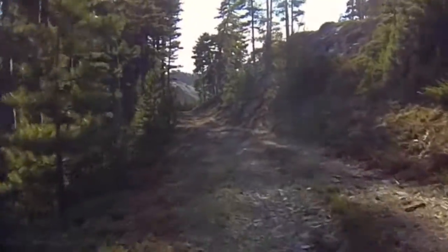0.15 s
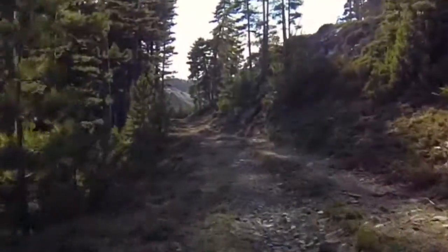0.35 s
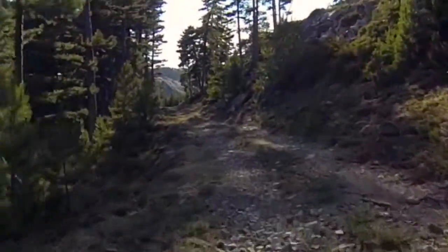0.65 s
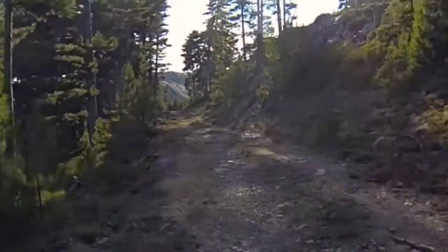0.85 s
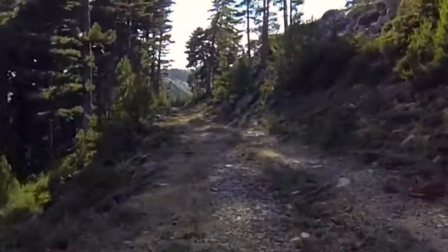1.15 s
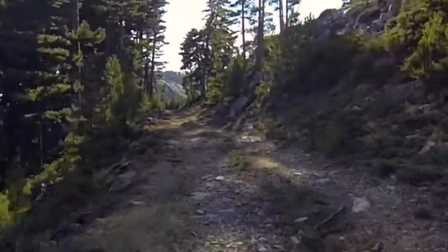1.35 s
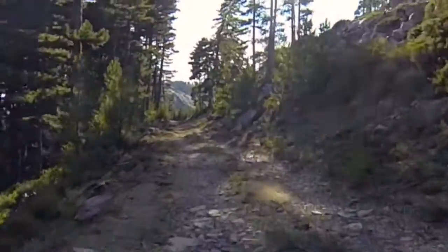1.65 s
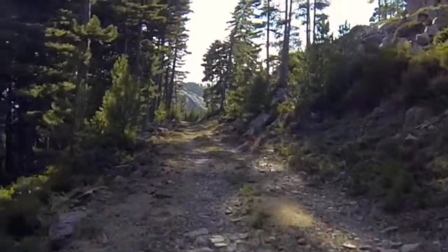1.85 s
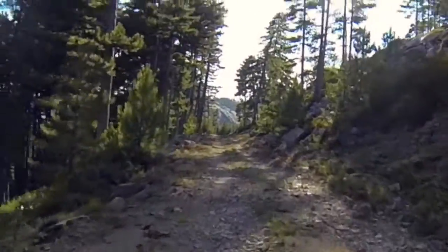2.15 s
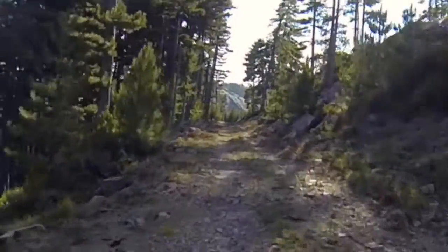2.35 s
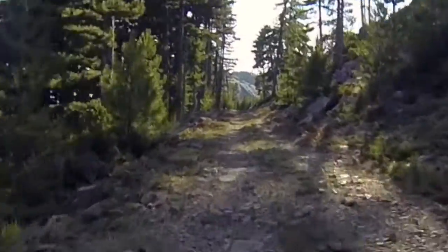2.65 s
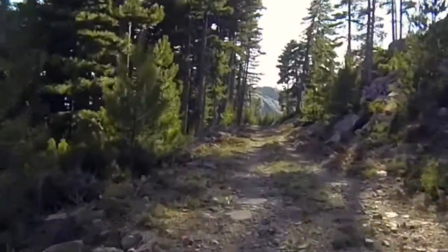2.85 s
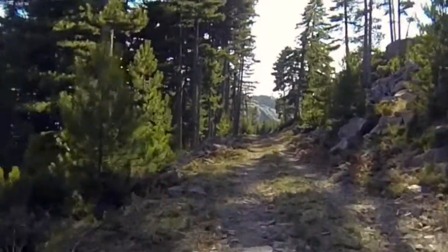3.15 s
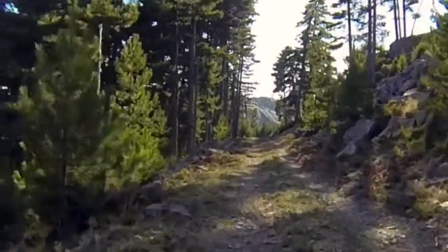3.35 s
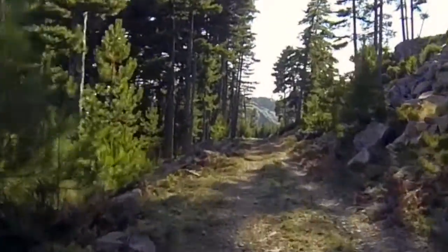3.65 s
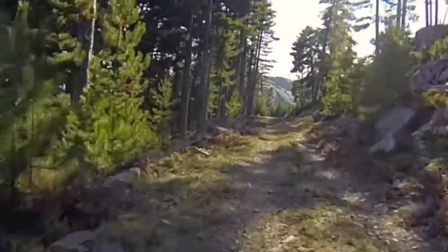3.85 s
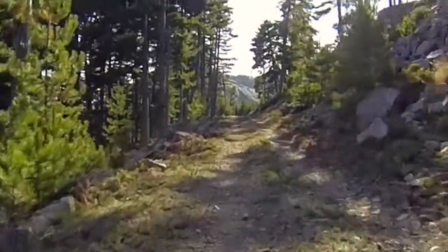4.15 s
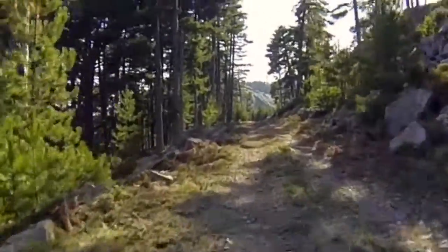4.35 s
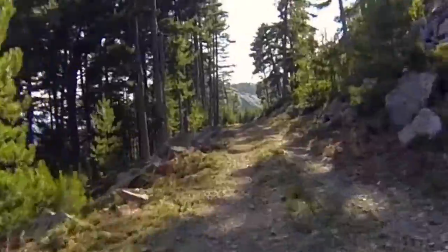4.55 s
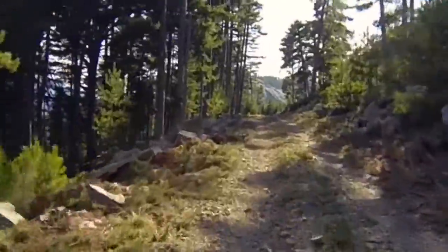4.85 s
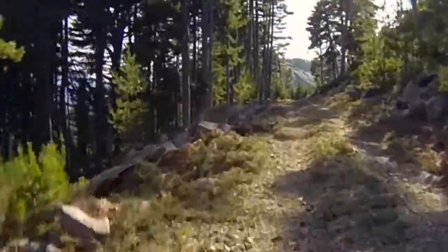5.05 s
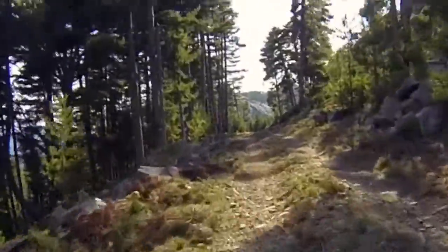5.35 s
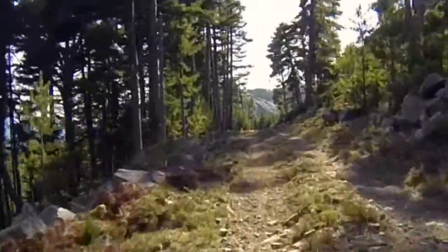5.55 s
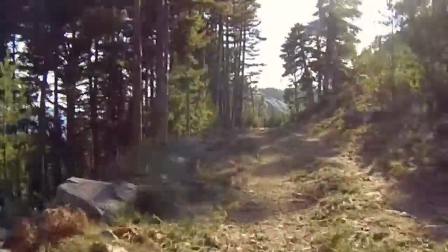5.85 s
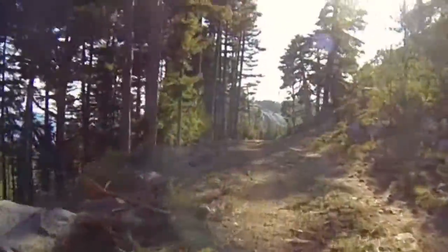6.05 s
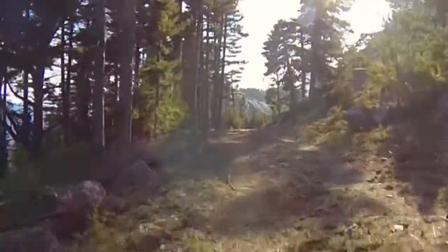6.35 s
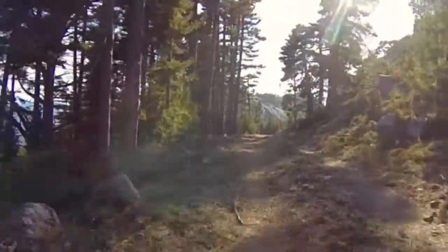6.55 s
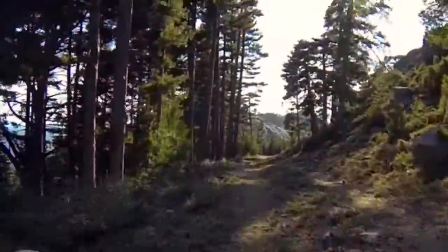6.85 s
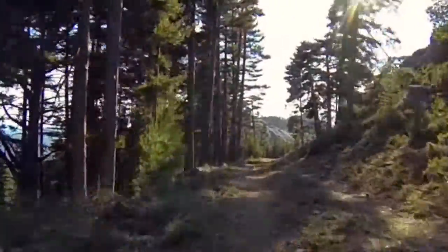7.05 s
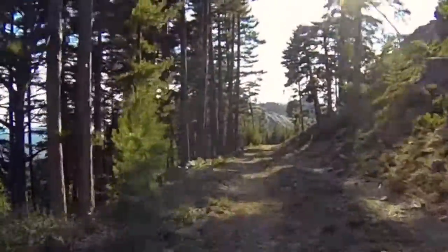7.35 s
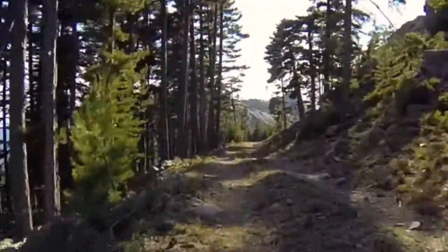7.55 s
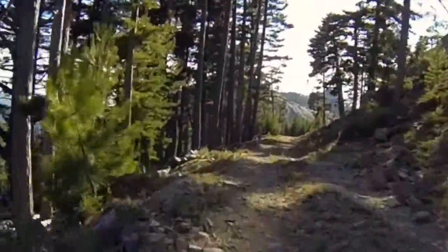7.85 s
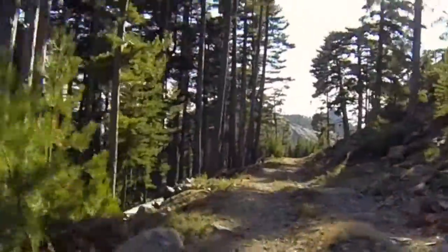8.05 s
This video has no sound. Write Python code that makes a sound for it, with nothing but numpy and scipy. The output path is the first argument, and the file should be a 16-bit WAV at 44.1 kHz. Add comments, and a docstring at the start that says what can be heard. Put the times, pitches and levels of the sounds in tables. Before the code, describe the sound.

A mountain bike rolls fast over a rocky trail for about eight seconds, heard close and muffled through a closed camera housing on the rider. From the start, jolts make a low, uneven boom while the tyres crunch over gravel, slip briefly on grit and knock hollowly on stones. Flung stones or the chain clack irregularly against the frame several times a second, over a faint thin hiss. Wind gusts on the microphone at about 0.5 seconds and again at 4. The hardest, sharpest clacks land at around 5.6 to 5.8 seconds and at 6.8; after the biggest, everything else dips and swells back. The wind rises to its strongest from about 7.3 to 7.8 seconds, and a heavy stone knock comes at 8 seconds as the bike keeps rolling.

```python
"""A mountain bike rolls fast down a rocky trail, heard from a closed camera housing on the rider.
From the start, jolts make the mount boom, tyres crunch over gravel and knock on stones, and flung
stones or the chain clack on the frame, all muffled by the housing. Wind gusts at half a second and
again at four. Near 5.6 and 6.8 s the hardest clacks land; the limiter ducks everything and lets it
swell back. The wind then rises to its strongest, and a heavy stone knocks just before the end."""
import sys
import numpy as np
from scipy import signal
from scipy.fft import rfft, irfft
from scipy.io import wavfile
from scipy.ndimage import uniform_filter1d, minimum_filter1d

SR = 44100
rng = np.random.default_rng(int(sys.argv[2]) if len(sys.argv) > 2 else 0)


def transcribe(u):
    """Save the signal u as a 16-bit wav file named by the first command-line argument.

    u: samples, shape (n,) or (channels, n), limited to [-1, 1]; the rate is SR.
    q: integer samples, one column per channel.
    """
    v = np.clip(np.atleast_2d(u).T, -1, 1)
    q = np.round(v * 32767).astype(np.int16)
    wavfile.write(sys.argv[1], SR, q)


N = 362040
TIME = np.arange(N) / SR

# Tone curves. Each row: frequency in Hz, relative level in dB.
RUMBLE_TONE = [(4, -19), (12, -15), (22, 0.5), (31, -5), (40, -1.5), (55, 0), (64, -5), (76, -15.5),
               (100, -26.5), (128, -26), (175, -33.5), (900, -79.5)]   # the shaken mount
WIND_TONE = [(30, -7.5), (80, -0.5), (128, 1), (175, -7.5), (230, -8.5), (400, -27), (1000, -47),
             (4000, -82)]   # low buffeting
HISS_TONE = [(1000, 16), (6000, 7), (9000, 16), (12000, -7), (15000, -10)]   # thin treble
CRUNCH_TONE = [(60, -5), (200, -5), (320, -3.5), (650, -2.5), (850, -1.5), (1130, -6), (1450, 1.5),
               (1620, -24.5), (2300, -15), (4000, -26.5), (8000, -45), (15000, -86)]   # dull, coarse gravel
GRIT_TONE = [(700, -25.5), (1600, -3), (2050, 3), (2450, -2.5), (3000, -7.5), (4000, -19), (5500, -24),
             (7000, -36), (10000, -42.5), (15000, -49)]   # bright, fine grit
SNAP_TONE = [(1500, -64.5), (3500, 21), (4600, 11), (5600, 5.5), (8500, -0.5), (10000, -13), (13000, -10),
             (15500, -15)]   # the crisp edge of a hit
# Resonances of the housing. Each row: centre in Hz, width in Hz, lift in dB.
HOUSING_MODES = [(220, 24, 5.5), (278, 42, 7.5), (302, 12, -1), (378, 29, 4.5), (492.4, 88, 5.5),
                 (770, 77, 6), (853, 66, 5.5), (982, 123, 8.5), (1250, 60, 5.5), (1520, 106, 5.5),
                 (1833, 260, 7.5), (2453, 81, 5), (3137, 210, 7.5), (4830, 230, 6.5), (6760, 170, 7),
                 (11150, 910, 13)]
# The frame's ring after a clack. Each row: pitch in Hz, relative level in dB, seconds to fall 60 dB.
FRAME_MODES = [(2420, -38, 0.18), (3100, -46, 0.25), (5040, -60, 0.29), (6433, -71, .3), (7004, -66, .3)]

# Fader moves. Each row: time in seconds, level in dB.
RUMBLE_FADER = [(0, -12.5), (.27, -21.5), (.6, -8.5), (.77, -20), (1.05, -13.5), (1.25, -17.5),
                (1.57, -11.5), (1.85, -17.5), (2.2, -12), (2.6, -17), (3.0, -25), (3.45, -13.5), (4.5, -15),
                (5.4, -12), (5.7, -15), (6.3, -11), (6.75, -19.5), (7.2, -9), (7.7, -14), (8.21, -10.5)]   # how hard the trail shakes the mount
WIND_FADER = [(0, -45), (.55, -26), (.8, -35.5), (2.4, -41), (2.8, -43), (3.4, -40), (4.0, -25.5),
              (4.4, -33), (5.4, -28), (6.75, -29), (7.3, -24), (7.8, -23.5), (8.21, -35)]   # gusts on the housing
HISS_FADER = [(0, -62), (.5, -61), (1.1, -57), (1.4, -71), (2.3, -67), (2.45, -59), (3.1, -73), (3.7, -65),
              (3.9, -57), (4.15, -59), (4.5, -62), (5.3, -63), (6.6, -65), (7.0, -70), (8.21, -69)]   # the hiss swells and fades
GRAVEL_FADER = [(0, -22.5), (.27, -25), (.45, -21.5), (.56, -27), (.68, -22.5), (.79, -25), (1.1, -21),
                (1.25, -26), (1.52, -24.5), (1.67, -19.5), (1.8, -25.5), (2.05, -22), (2.19, -18.5),
                (2.32, -28), (2.46, -22.5), (2.75, -26), (3.08, -29.5), (3.35, -25.5), (3.72, -27.5),
                (3.84, -21), (4.08, -18.5), (4.2, -24.5), (4.7, -23), (5.05, -20), (5.5, -18.5), (5.7, -21),
                (6.05, -24), (6.33, -19.5), (6.8, -28), (7.05, -23.5), (7.5, -26.5), (7.85, -22),
                (8.21, -21.5)]   # loose ground: drives crunch, grit, spatter and small blows
GRIT_OFFSET = [(0, -6), (1.0, -7.5), (2.1, -8.5), (2.55, -4), (3.2, -6), (4.6, -7.5), (6.7, -7),
               (7.0, -7.5), (7.5, -9.5), (7.8, -7), (8.21, -9.5)]   # grit against crunch, lower on soft trail

# A tyre slips on loose grit. Each row: start in seconds, length in seconds, level in dB.
TYRE_SLIPS = [(0.407, 0.048, -22.5), (1.007, 0.045, -24), (1.631, 0.031, -23.5), (1.859, 0.046, -28.5),
              (2.427, 0.039, -21.5), (2.617, 0.023, -29), (2.962, 0.03, -22), (3.303, 0.067, -29.5),
              (3.532, 0.048, -26), (5.035, 0.039, -27), (7.798, 0.02, -29), (7.922, 0.035, -25.5)]
# The tyres hit larger stones and the bike rattles.
# Each row: start in seconds, relative level in dB, pitch in Hz, contact length in seconds.
STONE_HITS = [(.045, -13, 860, 0.0067), (.1015, -8.5, 835, 0.01), (.363, -11.5, 1000, 0.0065),
              (.563, -12, 900, 0.0046), (.6355, -10.5, 940, 0.023), (.6694, -9, 1240, 0.014),
              (.875, -11.5, 920, 0.026), (1.1325, -11.5, 740, 0.038), (1.667, -15, 816, .01),
              (1.7003, -9.5, 960, 0.01), (2.1264, -11, 805, .0064), (2.3926, -12.5, 870, 0.013),
              (2.419, -15, 1250, 0.023), (2.4482, -6.5, 768, 0.012), (2.464, -11.5, 1220, 0.026),
              (2.643, -10, 1200, 0.018), (2.666, -13, 840, 0.012), (2.964, -14, 341, .025),
              (2.979, -10, 500, .016), (3.583, -15, 770, 0.016), (3.8261, -11, 950, 0.022),
              (4.036, -10, 890, 0.025), (4.1445, -13, 880, 0.0041), (4.2381, -15, 910, 0.0099),
              (4.2657, -11.5, 940, .0053), (4.649, -10.5, 880, 0.0073), (4.7383, -13, 915, 0.021),
              (4.821, -9.5, 1280, 0.0042), (4.991, -10.5, 1190, 0.012), (5.9888, -12, 774, 0.012),
              (7.041, -10, 890, 0.01), (7.506, -14.5, 667, 0.015), (7.596, -13, 940, 0.0079),
              (7.697, -13, 950, .008), (7.818, -10, 935, .02), (7.945, -12, 1140, 0.031),
              (7.9673, -9.5, 770, 0.0062), (8.0054, -3, 810, 0.0085)]
# Flung stones or the chain hit the frame. Each row: start in seconds, level in dB.
FRAME_HITS = [(.0825, -10.5), (.25, -9), (.4325, -12), (.49, -9), (.7374, -5.5), (.8228, -8), (.945, -11),
              (1.1401, -11), (1.2847, -10.5), (1.6085, -11.5), (1.637, -10.5), (1.6709, -7), (1.703, -8),
              (1.9292, -12.5), (2.221, -9), (2.3451, -11.5), (2.416, -5.5), (2.511, -5.5), (2.5835, -4),
              (2.6458, -7.5), (2.7197, -11.5), (2.986, -9.5), (3.1133, -15.5), (3.4246, -14.5),
              (3.5866, -9.5), (3.7332, -9), (3.855, -6.5), (4.039, -21), (4.3398, -13), (4.4151, -6),
              (4.488, -9), (4.9305, -9.5), (5.02, -9.5), (5.0615, -10.5), (5.1022, -9.5), (5.297, -7.5),
              (5.5487, -5.5), (5.6117, 14.5), (5.7693, 10), (5.78, 2), (5.8717, -9), (5.943, -9),
              (6.1826, -11.5), (6.342, -5.5), (6.739, 7.5), (6.8227, 18.5), (7.7593, -10.5), (7.8023, -11),
              (7.83, -10)]


def from_db(db):
    """Decibels to gain."""
    return 10 ** (np.asarray(db) / 20)


def unit_rms(x):
    """Scale to an rms of 1."""
    return x / np.sqrt(np.mean(x ** 2) + 1e-20)


def level_at(fader, s):
    """A fader's level in dB at the times s."""
    return np.interp(s, *np.transpose(fader))


def add(out, s, sound):
    """Mix a sound in from time s."""
    at = int(np.clip(round(s * SR), 0, N - 1))
    out[at:at + len(sound)] += sound[:N - at]


def drift(rate_hz, step=20):
    """A smooth random wobble with an rms of about 1."""
    pole = np.exp(-2 * np.pi * rate_hz * step / SR)
    slow = signal.lfilter([1], [1, -2 * pole, pole * pole], rng.standard_normal(N // step + 2002))[2000:]
    return np.interp(np.arange(N) / step, np.arange(len(slow)), unit_rms(slow))


def response(tone, resonances=(), size=2048):
    """Minimum-phase impulse response of a tone curve with resonances on top."""
    hz = np.maximum(np.fft.rfftfreq(size, 1 / SR), 1)
    tone_hz, tone_db = np.transpose(tone)
    db = np.interp(np.log(hz), np.log(tone_hz), tone_db)
    for centre, width, lift in resonances:
        db = db + lift / (1 + (2 * (hz - centre) / width) ** 2)
    cepstrum = irfft(np.log(from_db(db)))
    cepstrum[1:size // 2] *= 2   # folded so that nothing rings ahead of a hit
    cepstrum[size // 2 + 1:] = 0
    return irfft(np.exp(rfft(cepstrum)))


def through(x, impulse):
    """Pass a sound through a body."""
    return signal.oaconvolve(x, impulse)[:len(x)]


def resonate(x, hz, width_hz):
    """One resonance with a gain of 1 at its peak."""
    r = np.exp(-np.pi * width_hz / SR)
    feedback = [1, -2 * r * np.cos(2 * np.pi * hz / SR), r * r]
    return signal.lfilter(np.array([1, 0, -1]) * (1 - r * r) / 2, feedback, x + 1e-18)


def steady(x, seconds):
    """Ride the level to an rms of 1, leaving flutter faster than the given time."""
    size = max(int(seconds * SR), 1)
    return x / np.sqrt(uniform_filter1d(uniform_filter1d(x * x, size), size) + 1e-12)


def low_noise(tone, resonances, even_s):
    """Lumpy noise in the given tone, held at an even level."""
    impulse = response(tone, resonances, size=16384)
    noise = rng.standard_normal(N + len(impulse) - 1)
    return steady(signal.fftconvolve(noise, impulse, "valid"), even_s)


def contacts(size, per_s, scatter_db):
    """Tiny impacts at random moments and strengths."""
    impacts = (rng.random(size) < per_s / SR) * rng.standard_normal(size)
    return impacts * from_db(scatter_db * rng.standard_normal(size))


def hiss(flicker_db=2.5, flicker_hz=25):
    """A thin treble hiss swells, flickers and fades."""
    flicker = from_db(flicker_db * drift(flicker_hz))
    treble = through(rng.standard_normal(N), response(HISS_TONE))
    return from_db(level_at(HISS_FADER, TIME)) * unit_rms(flicker * treble)


def wind():
    """Gusts flutter around the housing."""
    return from_db(level_at(WIND_FADER, TIME)) * low_noise(WIND_TONE, [], even_s=0.24)


def rumble(mount_hz=56, width_hz=9, lift_db=7):
    """The trail shakes the mount, which booms at its own pitch."""
    boom = low_noise(RUMBLE_TONE, [(mount_hz, width_hz, lift_db)], even_s=0.08)
    return from_db(level_at(RUMBLE_FADER, TIME)) * boom


def spatter(per_s=55, spread_db=5, under_grit_db=25, click_s=0.001):
    """Tiny stones fly off the tread and tick crisply against the bike."""
    clicks = (rng.random(N) < per_s / SR) * from_db(spread_db * np.minimum(rng.exponential(1, N), 3))
    decay = np.exp(-np.arange(256) / (click_s * SR))
    bursts = through(clicks, decay) * rng.standard_normal(N)
    return from_db(-under_grit_db) * unit_rms(through(bursts, response(SNAP_TONE, HOUSING_MODES)))


def pebbles(load, tone, per_s, spread_db, low_hz, high_hz, q, tick_db, sand_db, pitches=24):
    """Pebbles pop under the tread at many pitches, more and harder under load, over a hiss of sand."""
    struck = rng.random(N) < per_s * load / SR
    strength = from_db(spread_db * np.minimum(rng.exponential(1, N), 3.5))
    clicks = struck * strength * rng.choice([-1, 1], N) * np.sqrt(load)
    pitch_index = rng.integers(0, pitches, N)
    pitched = sum(resonate(clicks * (pitch_index == k), hz, hz / q) / np.sqrt(hz)
                  for k, hz in enumerate(np.geomspace(low_hz, high_hz, pitches)))
    noise = np.sqrt(load) * rng.standard_normal(N)
    body = response(tone, HOUSING_MODES)
    pops, ticks, sand = [unit_rms(through(x, body)) for x in (pitched, clicks, noise)]
    return steady(pops + from_db(tick_db) * ticks + from_db(sand_db) * sand, seconds=0.31)


def rolling():
    """Coarse gravel crunches under the tread; bright grit and spatter rise and fall with it."""
    gravel_db = level_at(GRAVEL_FADER, TIME)
    grit_db = gravel_db + level_at(GRIT_OFFSET, TIME)
    load = from_db(3.6 * drift(rate_hz=40))   # the tyres press and skip over uneven ground
    crunch = pebbles(load, CRUNCH_TONE, per_s=500, spread_db=3, low_hz=307.7, high_hz=1930,
                     q=4.5, tick_db=-4.5, sand_db=-2.5)
    grit = pebbles(load, GRIT_TONE, per_s=400, spread_db=4.5, low_hz=1480, high_hz=5930,
                   q=6, tick_db=-13, sand_db=-6)
    return from_db(gravel_db) * crunch + from_db(grit_db) * (grit + spatter())


def scrapes(rasp_hz=2800, rasp_db=3, rasp_width_hz=900, edge_db=-9, edge_hz=4800, size=6000):
    """A slipping tread drags many tiny grains at once: a short rasp with a gritty edge."""
    out, t = np.zeros(N), np.arange(size) / SR
    body = response(GRIT_TONE, HOUSING_MODES)
    for s, length, db in TYRE_SLIPS:
        grains = contacts(size, per_s=3000, scatter_db=1.5)
        rasp = through(grains + from_db(rasp_db) * resonate(grains, rasp_hz, rasp_width_hz), body)
        edge = resonate(resonate(rasp, edge_hz, 4200), edge_hz, 4200)   # the finest grains rasp higher
        scrape = steady(unit_rms(rasp) + from_db(edge_db) * unit_rms(edge), seconds=0.028)
        arch = np.sqrt(abs(np.sin(np.pi * np.minimum(t / length, 1))))
        add(out, s, from_db(db) * arch * scrape)
    return out


def random_blows(per_s, lift_db, spread_db=2, count=200):
    """Cues at random, harder on loose gravel. Each row: start in seconds, level in dB."""
    s = np.cumsum(rng.gamma(2, .5, count)) / per_s
    db = level_at(GRAVEL_FADER, s) + lift_db + spread_db * rng.standard_normal(count)
    return np.column_stack([s, db])[s < N / SR]


def small_stones(hz=900, pitch_spread=0.206, contact_s=0.0074):
    """Cues like STONE_HITS for smaller stones, each with its own pitch."""
    return [(s, db, hz * np.exp(pitch_spread * rng.standard_normal()), contact_s)
            for s, db in random_blows(per_s=10, lift_db=4.5)]


def light_taps():
    """Cues like FRAME_HITS for light taps, whose level follows the grit."""
    return [(s, db + level_at(GRIT_OFFSET, s)) for s, db in random_blows(per_s=10, lift_db=12)]


def knocks(cues, trim_db=1, stone_db=9, stone_q=0.79, hollow_db=-3, hollow_cycles=3.3, size=4096):
    """A tyre hits a stone: one firm, hollow blow, a short volley of contacts and crushed chips."""
    out, t = np.zeros(N), np.arange(size) / SR
    dull, bright = response(CRUNCH_TONE, HOUSING_MODES), response(GRIT_TONE, HOUSING_MODES)
    for s, db, hz, length in cues:
        volley = contacts(size, per_s=2500, scatter_db=2)
        volley[0] = 2.1   # the firm first blow
        volley *= np.exp(-(t / max(0.7 * length, .002)) ** 2)
        thud = through(volley + from_db(stone_db) * resonate(volley, hz, hz / stone_q), dull)
        hollow = np.sin(2 * np.pi * hz * t) * np.exp(-t * hz / hollow_cycles) * (1 - np.exp(-t * hz))
        chips = unit_rms(through(volley, bright))
        chips_db = -11 + 4.5 * np.log2(max(length, .002) / .012)   # longer contacts crush more
        knock = unit_rms(thud) + from_db(hollow_db) * unit_rms(hollow) + from_db(chips_db) * chips
        peak_power = uniform_filter1d(knock ** 2, size=320).max()
        add(out, s, from_db(db + trim_db) * knock / np.sqrt(peak_power))
    return out


def clacks(cues, snap_db, rattle_db, pitch_spread, thud_db=-15, ring_db=-3, tube_hz=2190, hz_per_db=8.5,
           tube_attack_s=0.00079, snap_attack_s=0.00094, rattle_s=0.0035, size=8000):
    """A hit on the frame: a snap, a few strong cycles of tube wall, a rattle, a thud and a faint ring."""
    out, t = np.zeros(N), np.arange(size) / SR
    bright, dull, crisp = [response(tone, HOUSING_MODES) for tone in (GRIT_TONE, CRUNCH_TONE, SNAP_TONE)]
    ring = sum(from_db(ring_db + db - 60 * t / t60) * np.sin(2 * np.pi * hz * t)
               for hz, db, t60 in FRAME_MODES)
    tube_envelope = t / tube_attack_s * np.exp(1 - t / tube_attack_s)
    for s, db in cues:
        rattle_noise, thud_noise, snap_noise = rng.standard_normal((3, size))
        detune = np.exp(pitch_spread * rng.standard_normal())
        hz = (tube_hz + hz_per_db * db) * detune   # harder hits ring higher
        tube = tube_envelope * np.sin(2 * np.pi * hz * t)
        rattle = through(rattle_noise * np.exp(-t / rattle_s), bright)
        thud = through(thud_noise * np.exp(-t / rattle_s), dull)
        hit = tube + from_db(rattle_db) * rattle / abs(rattle).max()
        hit += from_db(thud_db) * thud / abs(thud).max()
        snap = through(snap_noise * t * np.exp(-t / snap_attack_s), crisp)
        snap *= from_db(snap_db) / np.sqrt(uniform_filter1d(snap ** 2, size=176).max())
        add(out, s, from_db(db) * (hit / abs(hit).max() + snap + ring))
    return out


def scene():
    """A mono mix: a bed of rumble, air and gravel, with knocks and clacks on top."""
    bed = rumble() + wind() + hiss() + rolling() + scrapes()
    big_blows = knocks(STONE_HITS) + clacks(FRAME_HITS, snap_db=-22.5, rattle_db=-4, pitch_spread=0.076)
    stones = knocks(small_stones())
    taps = clacks(light_taps(), snap_db=-18, rattle_db=-1, pitch_spread=0.16)
    return (bed + big_blows + stones + taps)[None]


def record(dry, ceiling_db=1.5, release_db_per_s=17, cutoff_hz=15300):
    """A limiter ducks just ahead of big peaks and recovers slowly; then soft clipping and a high cut."""
    over_db = np.maximum(20 * np.log10(abs(dry[0]) + 1e-9) - ceiling_db, 0)
    duck_db = np.maximum.accumulate(over_db + release_db_per_s * TIME) - release_db_per_s * TIME
    gain_db = uniform_filter1d(minimum_filter1d(-duck_db, size=25), size=25)   # smooth look-ahead
    limited = dry * from_db(gain_db)
    rounded = limited / (1 + limited ** 8) ** (1 / 8)
    return signal.sosfilt(signal.ellip(10, .1, 80, cutoff_hz, fs=SR, output="sos"), rounded)


dry = scene()
out = record(dry)
transcribe(out)
```